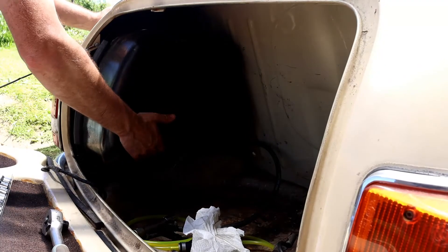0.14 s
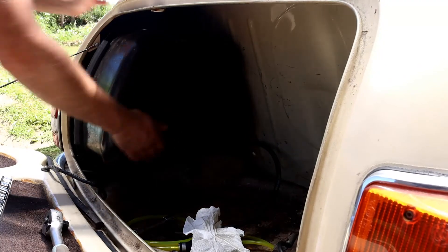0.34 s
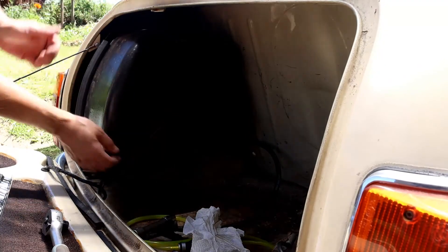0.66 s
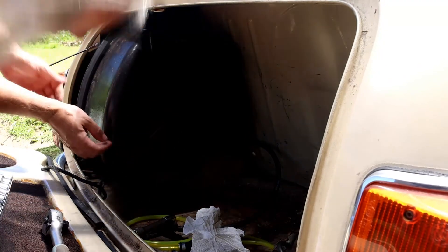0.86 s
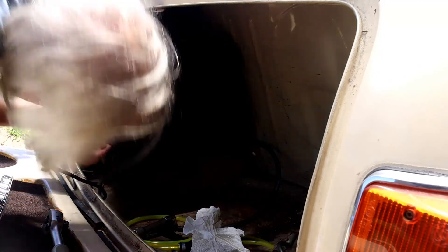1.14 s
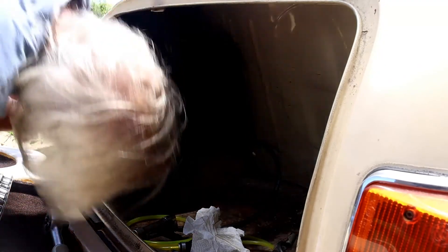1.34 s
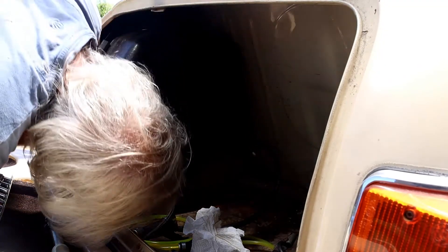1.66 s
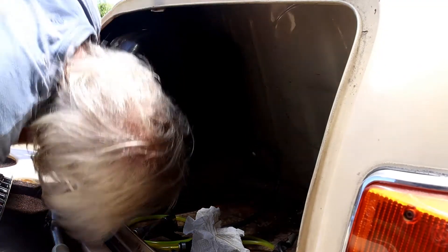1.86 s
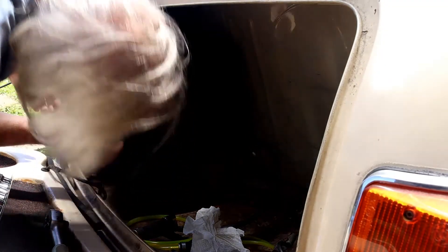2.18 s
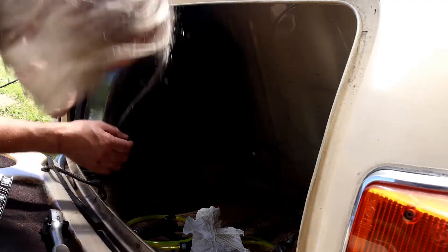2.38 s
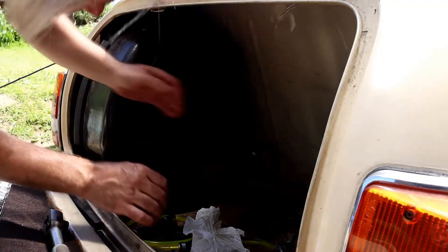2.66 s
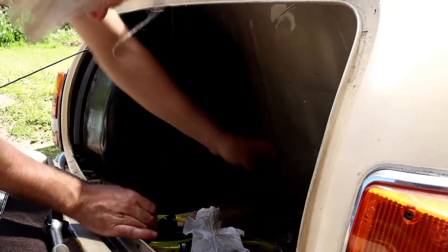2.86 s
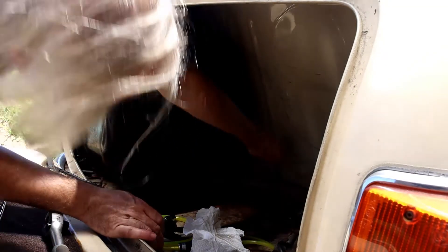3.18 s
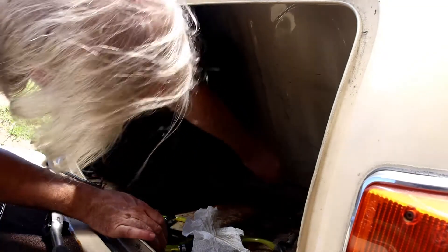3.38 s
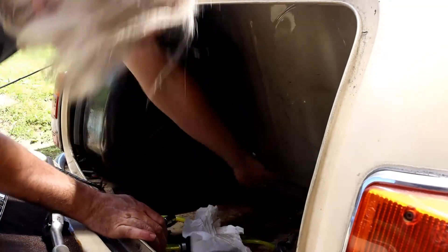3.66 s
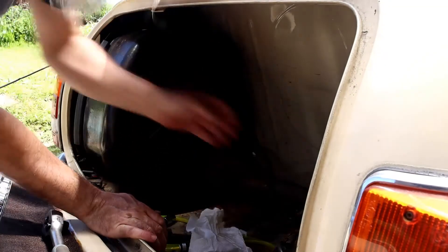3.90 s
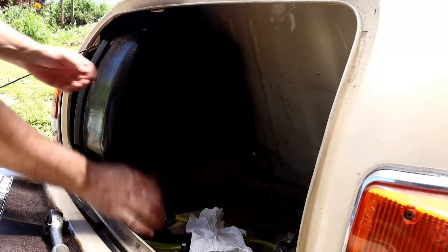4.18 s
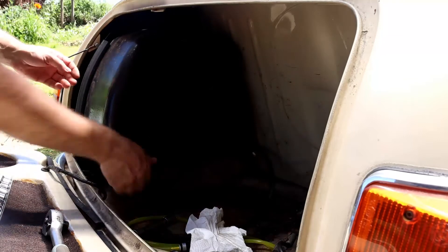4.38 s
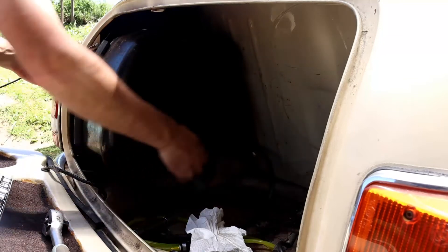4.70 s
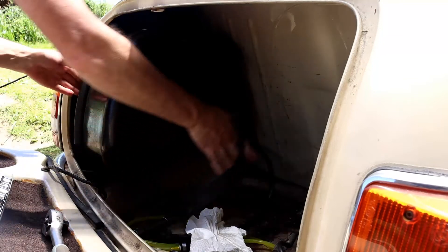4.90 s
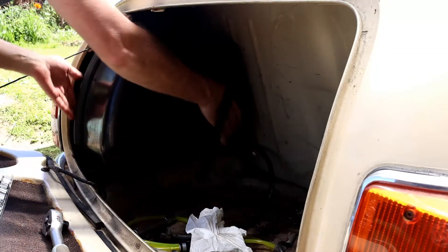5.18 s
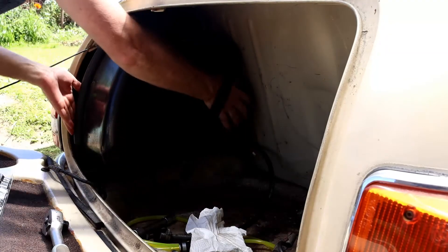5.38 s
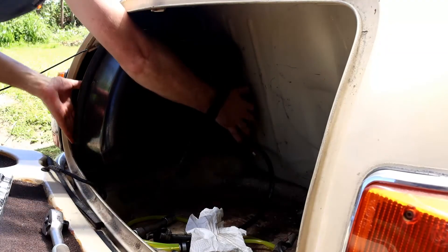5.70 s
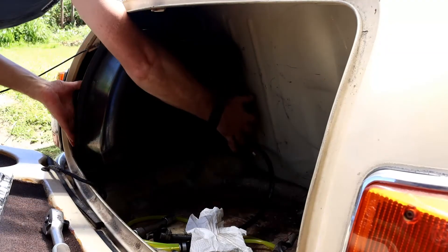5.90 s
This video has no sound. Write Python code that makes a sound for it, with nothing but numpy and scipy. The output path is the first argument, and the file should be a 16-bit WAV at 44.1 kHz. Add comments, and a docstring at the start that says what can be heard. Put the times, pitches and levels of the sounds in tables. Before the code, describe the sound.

Close, wide stereo microphones at an open car boot outdoors, with a soft low rumble behind. A hollow steel tank booms with quick knocks and a short drag, then arms and sleeves rustle with airy swishes and tiny ticks. After a quieter stretch, the tank suddenly clangs and chatters against sheet metal, pauses, then scrapes grittily with a thin metallic squeak and a few last bumps.

```python
"""A steel fuel tank is worked loose by hand inside the boot of a car, over a soft outdoor rumble.
It starts with booming knocks and a short drag; each knock rings metal modes and each drag is filtered friction noise.
Then sleeves and arms rustle (coloured friction noise), gliding bands of noise swish, and small parts tick.
After three seconds the tank clangs, chatters and drags again; the last efforts scrape with a gritty squeak."""
import sys
import numpy as np
from scipy import signal
from scipy.fft import rfft, irfft, next_fast_len
from scipy.io import wavfile
from scipy.ndimage import uniform_filter1d

SR = 44100
rng = np.random.default_rng(int(sys.argv[2]) if len(sys.argv) > 2 else 0)


def master_out(mix):
    """Clip the mix to full scale and print it as 16-bit PCM to the path in sys.argv[1]."""
    frames = np.transpose(np.atleast_2d(mix))
    ceiling = np.clip(frames, -1, 1)
    pcm = np.round(ceiling * 32767).astype(np.int16)
    wavfile.write(sys.argv[1], SR, pcm)


N = 266805
TIME = np.arange(N) / SR


def from_db(db):
    """Turn decibels into gain."""
    return np.exp(np.asarray(db) * (np.log(10) / 20))


def rms_one(x):
    """Scale a sound to an average (rms) level of one."""
    return x / np.sqrt(np.mean(x ** 2) + 1e-20)


def at_hz(points, hz):
    """Read a table between its points, on a logarithmic pitch axis."""
    table_hz, value = np.transpose(points)
    return np.interp(np.log(np.maximum(hz, 1)), np.log(table_hz), value)


def band(x, low_hz, high_hz, order=2):
    """Keep only the sound between two pitches."""
    edges = [low_hz, min(high_hz, .45 * SR)]
    return signal.sosfilt(signal.butter(order, edges, "band", fs=SR, output="sos"), x)


def add(out, start_s, sound):
    """Mix a sound in from a given time."""
    start = max(round(start_s * SR), 0)
    out[:, start:start + sound.shape[1]] += sound[:, :N - start]


def blend(plain, other, gain):
    """Mix two unrelated sounds of rms one so that the mix stays near rms one."""
    return (plain + gain * other) / np.sqrt(1 + gain ** 2)


# How wide the stereo sound is, from bass to treble: pitch_hz, side_minus_middle_db
WIDTH = [(60, -32), (110, -26), (200, -26), (380, -19), (700, -10), (1290, -7), (2380, -3), (4400, -2),
         (8120, -1), (15000, 0)]


def coloured(pair, spectrum):
    """Give two unrelated noises one spectrum and spread them in stereo: narrow in the bass, wide in the treble."""
    size = next_fast_len(pair.shape[1])
    hz = np.fft.rfftfreq(size, 1 / SR)
    mid, side = rfft(pair, size) * from_db(at_hz(spectrum, hz))
    left_right = mid + from_db(at_hz(WIDTH, hz)) * side * [[1], [-1]]
    return rms_one(irfft(left_right, size)[:, :pair.shape[1]])


def drift(per_s, size):
    """Wander at random, with straight lines between per_s new values a second."""
    knots = rng.standard_normal(2000)
    return np.interp(TIME[:size] * per_s, np.arange(len(knots)), knots)


def friction(per_s, spread_db, catch_db, size):
    """Countless tiny slips of uneven size, bunched as the surfaces catch and let go."""
    happens = rng.random(size) < per_s / SR
    sizes = from_db(spread_db * np.minimum(rng.exponential(1, size), 5)) * happens
    return rng.standard_normal((2, size)) * sizes * from_db(catch_db * drift(90, size))


def ring_down(blows, t60_s):
    """Amplitude of a plate that stores the energy of each blow and loses 60 dB in t60_s."""
    kept = from_db(-120 / (t60_s * SR))  # share of the energy left after one sample
    return np.sqrt(signal.lfilter([1], [1, -kept], blows))


def stroke(peak_s, rise_s, fall_s):
    """Speed of one movement: it gathers smoothly to its peak and then dies away."""
    early, late = np.maximum(peak_s - TIME, 0), np.maximum(TIME - peak_s, 0)
    return np.exp(-np.minimum((early / rise_s) ** 2 + late / fall_s, 20))


# Echoes between the walls of the boot: left_delay_s, right_delay_s
BOOT_ECHOES = [(.0023, .0023), (.0041, .0037), (.0059, .0059), (.0083, .0091), (.0127, .0127),
               (.0179, .0163), (.0233, .0233)]
BOOT_ECHO_DB = -14.5  # each echo against the direct sound


def boot(x):
    """The walls of the boot send back quick echoes that give a hollow colour; the level is roughly kept."""
    out, gain = x.copy(), from_db(BOOT_ECHO_DB)
    for delays in BOOT_ECHOES:
        for side, delay_s in enumerate(delays):
            lag = round(delay_s * SR)
            out[side, lag:] += gain * x[side, :-lag]
    return out / np.sqrt(1 + len(BOOT_ECHOES) * gain ** 2)


# Spectrum of the outdoor rumble: pitch_hz, level_db (per Hz, relative)
AIR = [(15, -61), (25, -15), (42, -14.5), (86, 1), (108, -3), (128, -10.5), (155, -3.5), (257, -11),
       (379, -11), (406, -16), (436, -16), (568, -21), (700, -17.5), (910, -27), (1540, -120)]
AIR_DB = -54


def outdoor_air():
    """Steady noise, shaped to be mostly bass, makes the soft outdoor rumble."""
    return from_db(AIR_DB) * coloured(rng.standard_normal((2, N)), AIR)


# Arms and sleeves brushing past the tank: peak_s (greatest speed), rise_s, fall_s, hiss_db, rub_db
BRUSHES = [(0.68, 0.096, 0.35, -47.5, -57), (0.85, 0.072, 0.15, -42, -48.5), (1.48, 1, 0.42, -54, -53),
           (2.15, 0.32, 0.32, -55, -51), (2.44, 0.36, 0.45, -52.5, -52.5), (3.07, 0.073, 0.17, -57.5, -60),
           (3.195, 0.021, 0.085, -55, -62), (3.36, 0.1, 0.1, -63, -62), (4.12, 0.094, 0.21, -56, -55.5)]
# Spectrum of brushing cloth: pitch_hz, level_db (per Hz, relative)
CLOTH = [(1290, -55), (2200, -8), (2730, -4), (2970, -6), (4310, -4.5), (5090, -5), (9250, -11),
         (12700, -9), (14600, -17), (16000, -47)]
# Spectrum of rubbing skin: pitch_hz, level_db (per Hz, relative)
RUB = [(260, -27), (450, 1), (497, -1), (823, 3), (1410, 1), (1520, 1), (1950, -4.5), (2800, -19),
       (3640, -18), (6160, -120)]
HOLD_HISS_DB, HOLD_RUB_DB = -66.5, -60  # the faint rubbing of hands that keep their grip


def rustle():
    """Cloth and skin brush along the tank and the rim of the boot: friction noise that follows each stroke."""
    power = from_db([[HOLD_HISS_DB], [HOLD_RUB_DB]]) ** 2
    for peak_s, rise_s, fall_s, hiss_db, rub_db in BRUSHES:
        power = power + (from_db([[hiss_db], [rub_db]]) * stroke(peak_s, rise_s, fall_s)) ** 2
    hiss, rub = np.sqrt(power)
    fibres = friction(per_s=20000, spread_db=0.5, catch_db=1.2, size=N)
    return hiss * boot(coloured(fibres, CLOTH)) + rub * coloured(fibres, RUB)


# Tugs that drag the tank over the panel; levels are before the trims in slide():
# peak_s (greatest speed), rise_s, fall_s, grit_db, panel_db, shudder_db, squeak_db (against the grit)
TUGS = [(0.04, 0.053, 0.049, -60, -51, -50.5, -20), (0.084, 0.027, 0.13, -50.5, -38, -42.5, -16),
        (0.261, 0.023, 0.27, -52, -45.5, -51.5, -18), (3.69, 0.27, 0.12, -43, -29, -37.5, -13),
        (4.664, 0.013, 0.031, -44, -43.5, -49, 0), (4.82, 0.056, 0.077, -47.5, -41, -43.5, 2),
        (4.97, 0.13, 0.11, -41, -42, -55, -3), (5.03, 0.052, 0.056, -34, -37.5, -43.5, 4),
        (5.075, 0.047, 0.065, -32.5, -37.5, -43, 7.5), (5.16, 0.05, 0.08, -41, -59, -53, -8),
        (5.235, 0.053, 0.065, -36.5, -40, -54, -16), (5.32, 0.079, 0.17, -36, -31.5, -43, -24),
        (5.46, 0.033, 0.074, -41.5, -39, -69, -11), (5.632, 0.025, 0.045, -35.5, -43, -54, -18),
        (5.675, 0.059, 0.039, -36.5, -26.5, -60, -22), (5.79, 0.12, 0.2, -45.5, -37, -44.5, -25),
        (6.019, 0.054, .2, -68, -41, -52, -25)]
SHUDDER_FOLLOWS = 0.94  # share of the stroke's swing in dB that the shudder follows
SHUDDER_T60_S = 0.11


def tugs():
    """Loudness over time of grit, panel, shudder and squeak; overlapping tugs add their energy."""
    power, shaking = 0, 0
    for peak_s, rise_s, fall_s, grit_db, panel_db, shudder_db, squeak_db in TUGS:
        speed = stroke(peak_s, rise_s, fall_s)
        power = power + (from_db([[grit_db], [panel_db], [grit_db + squeak_db]]) * speed) ** 2
        shaking = shaking + (from_db(shudder_db) * speed ** SHUDDER_FOLLOWS) ** 2
    grit, panel, squeak = np.sqrt(power)
    kept = from_db(-120 / (SHUDDER_T60_S * SR))
    shudder = ring_down((1 - kept) * shaking, SHUDDER_T60_S)
    return grit, panel, shudder, squeak / grit


BURR_T60_S = 0.055  # how long a caught burr sings


def catches(per_s, low_hz, high_hz, spread_db):
    """Burrs catch and let go at random; each sings briefly at a pitch of its own."""
    out, t = np.zeros((2, N)), TIME[:SR // 12]
    fade = from_db(-60 * t / BURR_T60_S)
    for when, pitch, size, left, right in rng.random((int(per_s * N / SR), 5)):
        pitch_hz = low_hz + pitch * (high_hz - low_hz)
        turns = pitch_hz * t + [[left], [right]]
        add(out, when * TIME[-1], from_db(spread_db * size) * fade * np.sin(2 * np.pi * turns))
    return out


def resonate(slips, modes, flicker_db):
    """Slips excite steel resonances, which come and go as the point of contact travels."""
    out = 0
    for hz, width_hz, level_db in modes:
        resonance = signal.lfilter(*signal.iirpeak(hz, hz / width_hz, fs=SR), slips)
        out = out + from_db(level_db + flicker_db * drift(35, slips.shape[1])) * resonance
    return rms_one(out)


# Spectrum of the gritty scratch: pitch_hz, level_db (per Hz, relative)
GRIT = [(1180, -55), (2000, -0.5), (2910, 1), (3140, -1), (3430, 0), (4990, 2), (5440, -0.5), (7980, -2.5),
        (9250, -4.5), (11800, -2.5), (13900, -5.5), (16000, -33)]
# Spectrum of the rasping panel: pitch_hz, level_db (per Hz, relative)
SLIDE_PANEL = [(290, -38), (500, -6), (537, -46), (590, 4), (692, -9), (828, 5), (977, -3), (1050, 3.5),
               (1540, -2), (1820, -2), (2800, -13.5), (3640, -17), (6160, -120)]
# Spectrum of the shuddering hollow tank: pitch_hz, level_db (per Hz, relative)
SHUDDER = [(26, -32), (45, -29), (70, 1.5), (123, -5), (161, -10.5), (205, 1), (238, -5), (273, 2),
           (312, -7), (377, -2), (550, -7.5), (720, -23), (1210, -120)]
# Bending modes of a thin steel strap, which squeaks: pitch_hz, width_hz, level_db (relative)
STRAP_MODES = [(1630, 30, -7), (1930, 35, -9), (2550, 30, -6), (3110, 75, -7), (4230, 120, -6),
               (4580, 50, -7), (4830, 35, -1), (5070, 25, 2), (5670, 32, -8), (6070, 45, -5),
               (6400, 29, -7), (6830, 32, -3), (7260, 36, -6), (7710, 47, -7), (8210, 34, -3),
               (8690, 60, -9), (9230, 60, -9), (9780, 60, -9), (10300, 28, 0), (10900, 38, -7),
               (11500, 70, -8), (12050, 70, -7), (12400, 45, -7), (12700, 38, -7), (13400, 31, -8)]


def slide(grit_db, panel_db, scratch_db, ring_db):
    """Steel dragged over steel: grit scratches, a strap squeaks, the panel rasps and rings, the hollow tank shudders."""
    grit, panel, shudder, squeakiness = tugs()
    slips = friction(per_s=8000, spread_db=1.1, catch_db=-0.1, size=N)

    scratches = coloured(catches(per_s=700, low_hz=1800, high_hz=13860, spread_db=12), GRIT)
    hiss = boot(blend(coloured(slips, GRIT), scratches, from_db(scratch_db)))
    hiss = blend(hiss, resonate(slips, STRAP_MODES, flicker_db=3.0), squeakiness)

    rings = coloured(catches(per_s=200, low_hz=567, high_hz=2576, spread_db=12.5), SLIDE_PANEL)
    rasp = blend(coloured(slips, SLIDE_PANEL), rings, from_db(ring_db))

    scrape = from_db(grit_db) * grit * hiss + from_db(panel_db) * panel * rasp
    return scrape + shudder * coloured(slips, SHUDDER)


def contact(t, chatter_s, hardness, rebounds_per_s, rebound):
    """Energy of one contact over time: a hard one lands at once, a soft one builds up through its rebounds."""
    hardness = np.clip(hardness, .01, 1)
    touches = rng.random(len(t)) < rebounds_per_s / SR
    fade = np.exp(-(t / chatter_s) ** 2)
    build_up = 1 - np.exp(-t / (0.00033 + 0.0033 * (1 - hardness) ** 2))
    blows = rebound * rng.exponential(1, len(t)) * touches * fade * build_up
    blows[0] = hardness ** 4  # the first blow
    return blows


NOTE_HALO_DB, NOTE_HALO_OCTAVES = 3.5, 0.28  # lift at the note, and distance where it has shrunk to 37 %


def near_note(rows, note_hz):
    """Lift the levels of a pitch table close to the note of a contact."""
    hz, db = np.transpose(rows)
    return hz, db + NOTE_HALO_DB * np.exp(-(np.log2(hz / note_hz) / NOTE_HALO_OCTAVES) ** 2)


# How the sheet metal answers in six registers: thump, boom, body, clang, clank and crack:
# low_hz, high_hz, t60_s (time to fade by 60 dB), tail_db (slow tail against the main ring),
# clear_share (clear modes, 0-1), level_db (before the drive of the contact), weight_share and
# bite_share (parts of the contact's weight and bite it takes), soft_loss_db (lost in a fully soft contact)
REGISTERS = [(35.3, 114.7, 0.12, -1, 0.1, -18.5, 0.99, 0.036, -4),
             (116, 335, 0.36, -25, 0.7, -7.5, 0.2, 0, -1),
             (326, 1030, 0.16, -23, 0.27, -5.5, 0.015, 0.18, 6),
             (1040, 2020, 0.13, -29, 0.6, -6, 0.072, 0.0035, 42),
             (1965, 4600, 0.15, -39, 0.27, -8, 0.016, 1, 62),
             (4220, 24000, 0.17, -36, .15, -19, 0.032, 0.94, 15)]
# Modes of the tank: pitch_hz, level_db (relative)
TANK_MODES = [(140.0, -37), (211, -35), (274.5, -42), (369, -45), (446.8, -38.5), (592, -42), (624.5, -41),
              (736, -33), (848, -35.5), (942, -38.5), (1109, -46), (1165, -44), (1324, -50), (1394, -42.5),
              (1462, -41), (1631, -42.5), (1680, -45), (1760, -64), (1825, -49), (1916, -41.5), (2040, -49),
              (2137, -52), (2396, -46.5), (2560, -52), (2638, -52), (2719, -61), (2830, -49), (3122, -54),
              (3214, -61), (3365, -59), (3900, -70), (4150, -74)]
# The crowd of weaker panel modes: pitch_hz, level_db (per Hz, relative)
PANEL = [(29, -49), (50, -16), (72, -14), (137, -6), (174, -7.5), (206, -3), (244, -19), (275, -8),
         (385, -12.5), (455, -10.5), (538, -20.5), (607, -15), (1440, -22.5), (2300, -27.5), (3300, -34),
         (6380, -46), (11900, -45.5), (15500, -62)]
TAIL_T60_S = 0.81
NOTE_LIFT_DB = 6  # a contact's note lifts its whole register


def knock(strength_db, weight_db, hardness, bite_db, note_hz, blows, note_db, mode_spread_db):
    """Blows feed the tank's modes and the panels: weight brings mostly bass, hardness and bite mostly treble."""
    t = TIME[:len(blows)]
    crowd_hz = np.geomspace(20, SR / 2, 200)
    crowd = near_note(np.transpose([crowd_hz, at_hz(PANEL, crowd_hz)]), note_hz)
    panels = coloured(rng.standard_normal((2, len(t))), np.transpose(crowd))

    hz, mode_db = near_note(TANK_MODES, note_hz)
    strength = from_db(mode_db + mode_spread_db * rng.standard_normal(len(hz)))
    # the contact's own note stands above its neighbours and takes over the mode it falls on
    octaves_away = np.abs(np.log2(hz / note_hz))
    note = from_db(note_db) * strength[octaves_away < octaves_away.min() + 1].max()
    strength = np.append(strength * (octaves_away > .04), note)
    hz = np.append(hz, note_hz)

    # higher modes reach the two sides in more different phases
    skew = np.arctan(from_db(at_hz(WIDTH, hz))) * rng.choice([-1, 1], len(hz))
    strength = strength * rng.choice([-1, 1], len(hz))

    out = 0
    for low, high, t60_s, tail_db, clear, level_db, weight_share, bite_share, soft_loss_db in REGISTERS:
        modes = np.zeros((2, len(t)))
        for k in np.flatnonzero((hz >= low) & (hz < high)):
            modes += strength[k] * np.sin(2 * np.pi * hz[k] * t + [[-skew[k]], [skew[k]]])
        crowd_sound = rms_one(band(panels, low, high, order=4))
        metal = np.sqrt(clear) * rms_one(modes) + np.sqrt(1 - clear) * crowd_sound
        swing = ring_down(blows, t60_s) + from_db(tail_db) * ring_down(blows, TAIL_T60_S)
        sound = band(metal * swing, low / 2, high * 1.58, order=3)
        # loudest stretch of a thirtieth of a second
        energy = uniform_filter1d(np.mean(sound ** 2, axis=0), size=SR // 30, mode="constant")
        loudest = np.sqrt(energy.max())
        drive_db = strength_db + weight_share * weight_db + bite_share * bite_db
        drive_db += NOTE_LIFT_DB * (low <= note_hz < high) - (1 - hardness) * soft_loss_db
        out = out + from_db(level_db + drive_db) * sound / loudest
    return out


# Tank against car body: start_s, strength_db (relative), weight_db (weight behind it, relative),
# hardness (0-1), bite_db (bite of the edge, relative), chatter_s, note_hz (note it brings out),
# ring_db (level at which that note rings on)
KNOCKS = [(0.062, -39, 21.5, 0.1, 0, 0.047, 194, -48), (0.1325, -23, 3, 0.84, -2.5, 0.0027, 746, -31),
          (0.142, -28, 11.5, 0.95, -6, 0.0056, 582, -26), (0.161, -34.5, 10, 0.95, -24, 0.003, 196.4, -22),
          (0.246, -39.5, 12, 0.73, -3, 0.012, 144, -42), (3.388, -43.5, -11, 0.89, 11, 0.027, 460, -58),
          (3.404, -35, -6, 0.82, 0, 0.017, 283, -42), (3.4686, -31, -19, 1, -1, 0.002, 3820, -50),
          (3.469, -40, -13, 1, -2, 0.002, 1162, -30), (3.515, -26.5, -14, 0.95, 0, 0.0075, 1110, -29),
          (3.526, -26.5, 7, 1, 1, 0.025, 860, -37), (3.659, -25.5, -27, 0.9, -2, 0.0026, 1203, -42),
          (3.667, -34, -20, 0.98, 2, .002, 860, -46), (3.714, -19.5, -45, 0.95, -4, 0.014, 1632, -40),
          (3.727, -24, -18, 0.85, -6, 0.0034, 1450, -35), (3.748, -30, -15, 0.88, 8, 0.0094, 1394, -36),
          (3.7926, -28.5, -18, 0.88, 3, 0.002, 1406, -35), (3.818, -32, -8, 0, 4, 0.014, 395, -36),
          (3.982, -46.5, -16, 0.15, 14, 0.01, 447, -41), (4.178, -47, 13, 0.92, 8.5, 0.018, 1895, -58),
          (4.211, -46.5, 2, 1, 1, 0.015, 277, -59), (4.66, -57, 4, 0.84, -3, 0.003, 1340, -43),
          (4.675, -47, 5, 0.75, 2, 0.09, 441, -43.5), (4.732, -40, 16.5, 0.14, -5, 0.018, 276.7, -34),
          (4.811, -56, 0, .9, -3, .006, 2035, -47), (4.816, -52, 13, .9, 0, .004, 1055, -44),
          (5.061, -30, -2, 0.8, -0.5, 0.053, 72, -32), (5.277, -44.5, -3, 1, 8, 0.006, 1435, -49),
          (5.327, -40.5, 21, 0.93, 10, 0.023, 438, -32), (5.342, -35.5, 7, 0.5, -4, 0.017, 368, -29.5),
          (5.622, -47, -20, 0.9, 8, 0.005, 3250, -40), (5.65, -44, -15, 0.94, 5, 0.0077, 845, -38),
          (5.679, -44, -12, 1, 11, 0.004, 1043, -41)]
NOTE_T60_S = 0.14


def knocks():
    """The tank bumps about in its recess; each contact excites the metal and leaves one note ringing."""
    out, t = np.zeros((2, N)), TIME[:SR // 2]
    for start_s, strength_db, weight_db, hardness, bite_db, chatter_s, note_hz, ring_db in KNOCKS:
        blows = contact(t, chatter_s, hardness, rebounds_per_s=1100, rebound=0.025)
        swing = ring_down(blows, NOTE_T60_S)
        soft_start = 1 - np.exp(-note_hz * t)
        ring = from_db(ring_db) * swing / swing.max() * np.cos(2 * np.pi * note_hz * t) * soft_start
        metal = knock(strength_db, weight_db, hardness, bite_db, note_hz, blows, note_db=5.0, mode_spread_db=4.0)
        add(out, start_s, ring + metal)
    return out


# The tank sticks and slips in a quick run of booms: start_s, length_s, slips_per_s, boom_hz, level_db
JUDDERS = [(0.062, 0.06, 56, 160, -31), (3.5165, 0.08, 70.3, 214, -20.5)]


def judders(fade_db, spread, jitter_s):
    """Each slip thumps the tank's wall, which the hand damps at once; the run weakens and stops."""
    out = np.zeros((2, N))
    for start_s, length_s, slips_per_s, boom_hz, level_db in JUDDERS:
        when = np.arange(0, length_s, 1 / slips_per_s)
        late = jitter_s * rng.random(len(when))
        slips = np.zeros(SR // 4)
        slips[((when + late) * SR).astype(int)] = from_db(-fade_db * when / length_s)
        boom = band(slips, boom_hz / spread, boom_hz * spread)
        average = np.sqrt(np.sum(boom ** 2) / (length_s * SR))
        add(out, start_s, from_db(level_db) * boom[None] / average)
    return out


# Narrow-band squeals of skin or steel sliding over paint:
# peak_s, length_s (from the peak to 37 %), pitch_hz (at the peak), glide_hz_per_s, width_hz, level_db (at the peak)
SWISHES = [(0.48, 0.089, 5300, 2613, 300, -61), (0.611, 0.07, 5100, -2600, 350, -54),
           (0.76, 0.096, 4950, 1, 500, -53), (0.786, 0.012, 2480, 4, 250, -48),
           (0.841, 0.018, 2570, 3998, 300, -47.5), (0.938, 0.049, 1550, -0.5, 700, -47),
           (4.139, 0.01, 6100, 1, 500, -52.5), (5.725, 0.049, 1344, -2, 160, -43.5),
           (5.76, 0.1, 1793, -400, 360, -43.5)]


def swishes():
    """A surface sliding on smooth paint hisses in one narrow band that glides, swells and fades with the stroke."""
    out = 0
    for peak_s, length_s, hz, glide_hz_per_s, width_hz, level_db in SWISHES:
        pitch_hz = hz + glide_hz_per_s * np.clip(TIME - peak_s, -2 * length_s, 2 * length_s)
        phase = 2 * np.pi * np.cumsum(pitch_hz) / SR
        # slow noise, moved up to the gliding pitch
        lowpass = signal.butter(2, width_hz / 2, fs=SR, output="sos")
        a, b = signal.sosfilt(lowpass, rng.standard_normal((2, 2, N)))
        hiss = rms_one(a * np.cos(phase) + b * np.sin(phase))
        out = out + from_db(level_db) * hiss * np.exp(-((TIME - peak_s) / length_s) ** 2)
    return out


def from_left(x, lag_s):
    """Sound from the left reaches the right microphone a little later."""
    return np.array([x[0], np.interp(TIME - lag_s, TIME, x[1])])


# Small hard parts touching: start_s, snap_db (before the trim in ticks()), ring_hz, ring_db (against the snap)
TICKS = [(0.607, -35, 2810, -6), (0.623, -45, 2920, 3.5), (0.6718, -37, 2720, 1), (0.682, -33, 4000, -9),
         (0.713, -34, 5000, -7), (0.7807, -37, 2460, -2), (0.829, -27, 7000, -8), (0.862, -25, 7600, -13),
         (0.894, -39, 7000, -1), (0.909, -31.5, 2930, -6), (0.948, -25.5, 6800, -4), (1.004, -47, 3470, -5),
         (1.085, -36.5, 3260, -4), (2.448, -37, 3110, -2), (2.484, -33.5, 2230, -1),
         (2.609, -29, 3210, -15.5), (2.863, -42.5, 2090, 0), (2.9197, -36.5, 2560, -5.5),
         (2.966, -44, 2400, -2), (3.4682, -8.5, 3720, -17.5), (3.749, -39, 4000, -11),
         (4.1784, -45, 1900, 5), (5.68, -16, 1670, -8)]
TICK_T60_S = 0.08


def ticks(level_db, snap_s, ping_db):
    """Hard little contacts: a sharp bright snap, then a short ring in the boot with a ping at its centre."""
    out, t = np.zeros((2, N)), TIME[:SR // 8]
    for start_s, snap_db, ring_hz, ring_db in TICKS:
        snap, ring, ping = rng.standard_normal((3, 2, len(t)))
        snap = rms_one(band(snap, 1400, 8800, order=1)) * np.exp(-t / snap_s)
        ring = rms_one(band(ring, ring_hz / 2, ring_hz * 2, order=1))
        ping = rms_one(band(ping, ring_hz * 0.86, ring_hz * 1.14, order=1))
        ring = blend(ring, ping, from_db(ping_db)) * from_db(ring_db - 60 * t / TICK_T60_S)
        add(out, start_s, from_db(snap_db + level_db) * (snap + ring))
    return out


def scene():
    """The work in the boot, over the outdoor air."""
    air = outdoor_air()
    hands = from_left(rustle() + swishes(), lag_s=.0001)
    tank = slide(grit_db=0.5, panel_db=-9.5, scratch_db=-4.5, ring_db=-0.5)
    tank = tank + knocks() + judders(fade_db=5, spread=1.305, jitter_s=0.00041)
    return air + hands + tank + ticks(level_db=-5.5, snap_s=0.00029, ping_db=0.5)


# The two microphones differ in colour: pitch_hz, left_minus_right_db
MIC_BALANCE = [(150, 0), (380, .4), (700, .7), (1290, -.6), (2380, -2.4), (4400, -.7), (8120, -1.8),
               (15000, 1)]
CUTOFF_HZ = 15600


def record(dry):
    """Each microphone adds its colour; the top is cut steeply."""
    size = next_fast_len(N)
    tilt_db = at_hz(MIC_BALANCE, np.fft.rfftfreq(size, 1 / SR))
    heard = irfft(rfft(dry, size) * from_db(tilt_db * [[.5], [-.5]]), size)[:, :N]
    return signal.sosfilt(signal.ellip(10, .2, 90, CUTOFF_HZ, fs=SR, output="sos"), heard)


dry = scene()
out = record(dry)
master_out(out)
```